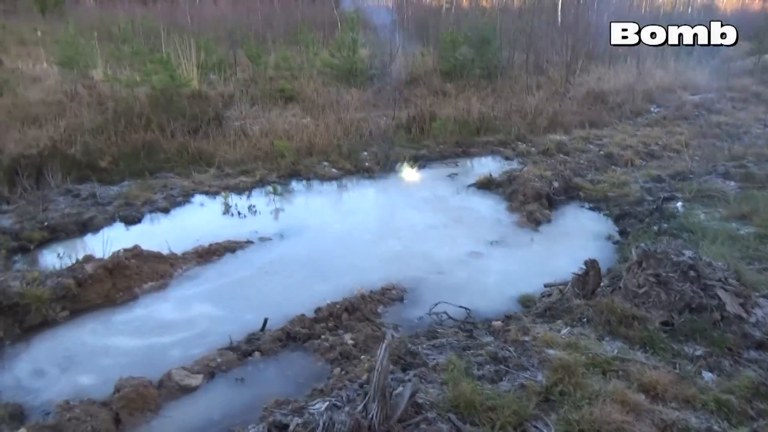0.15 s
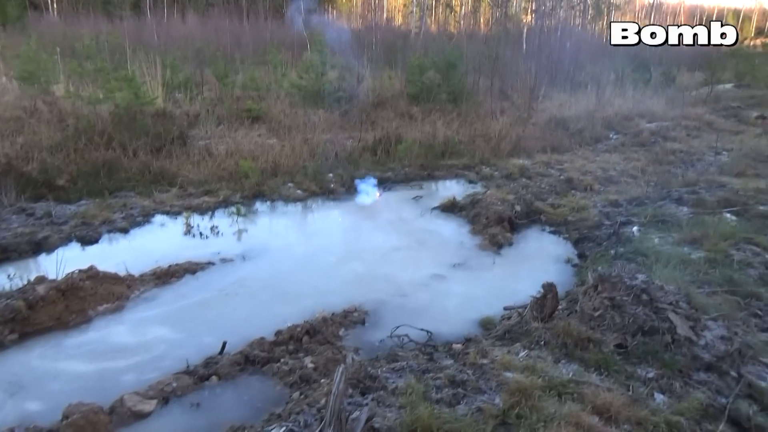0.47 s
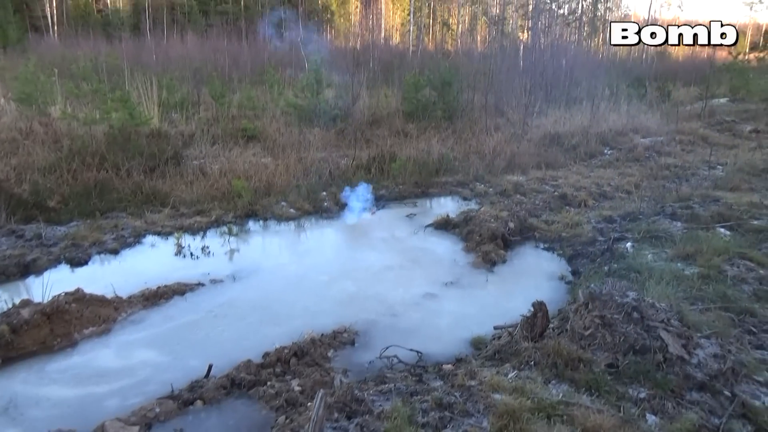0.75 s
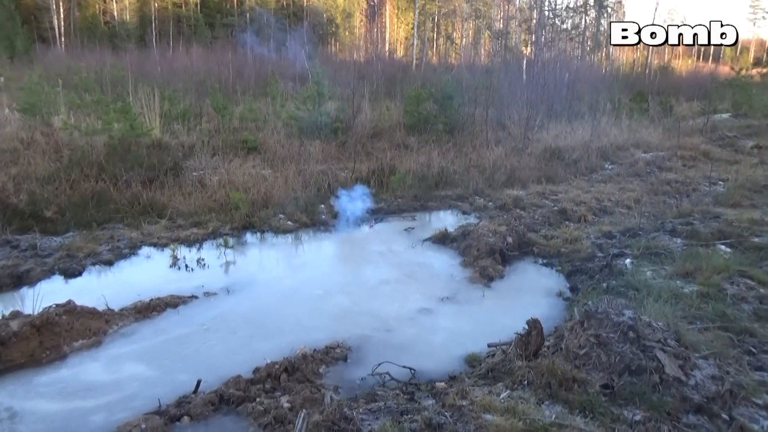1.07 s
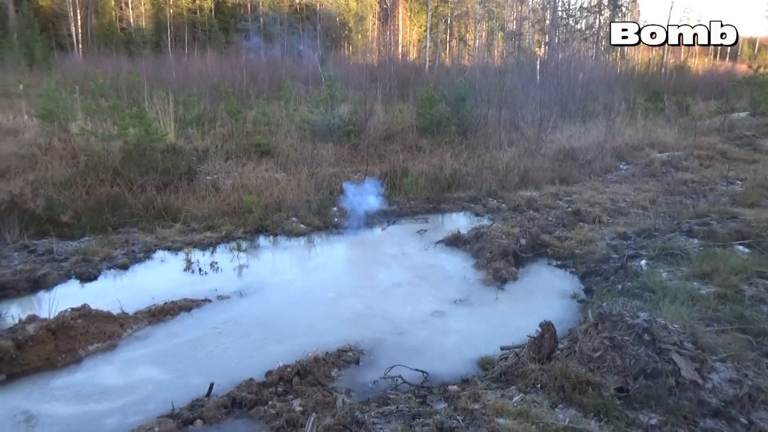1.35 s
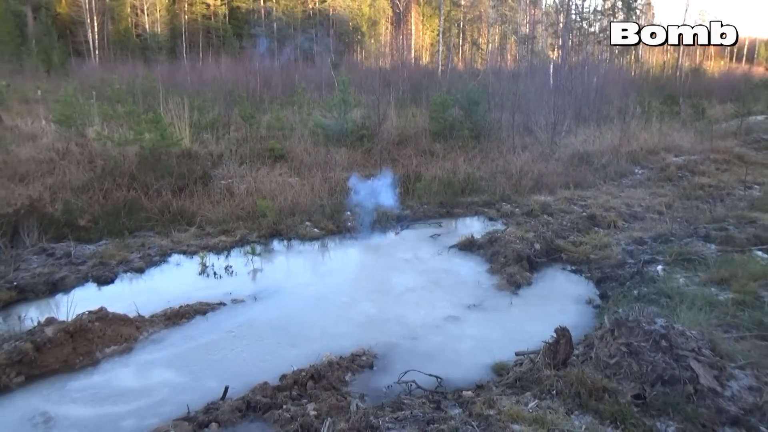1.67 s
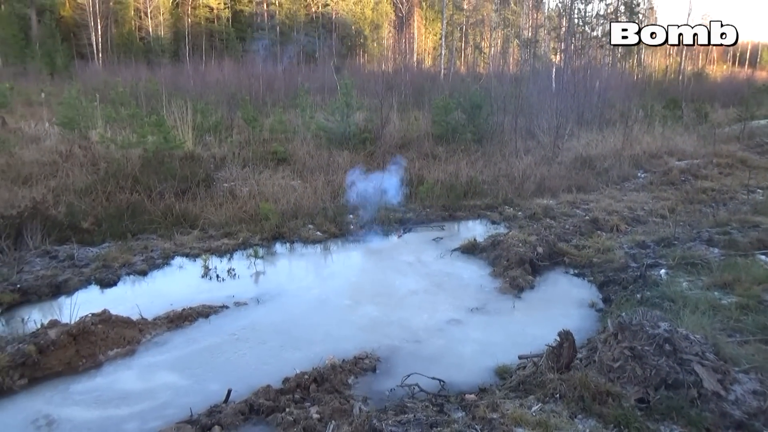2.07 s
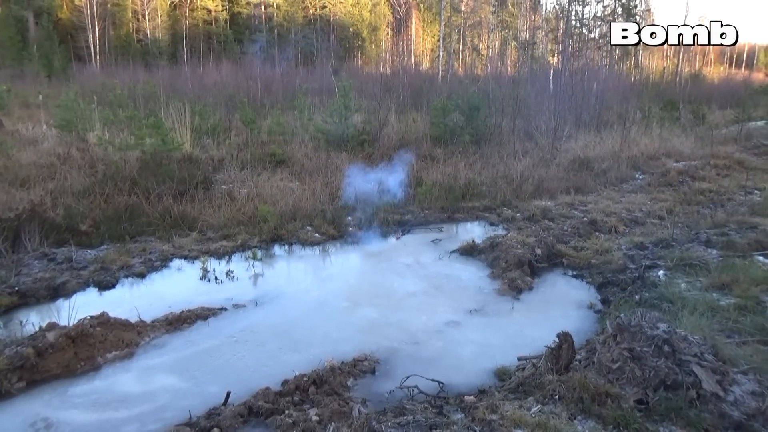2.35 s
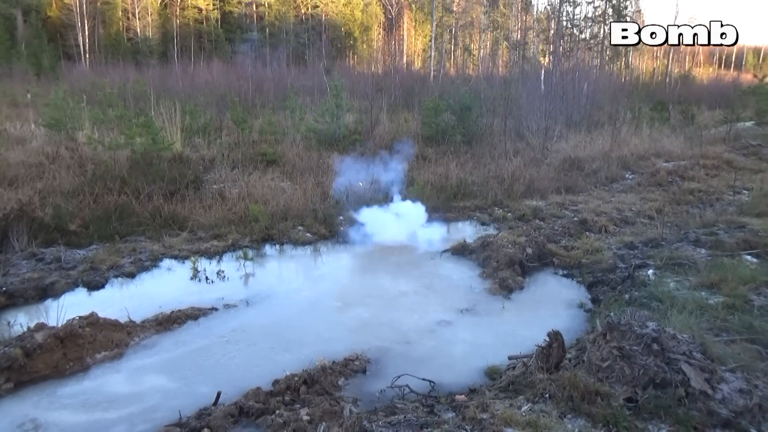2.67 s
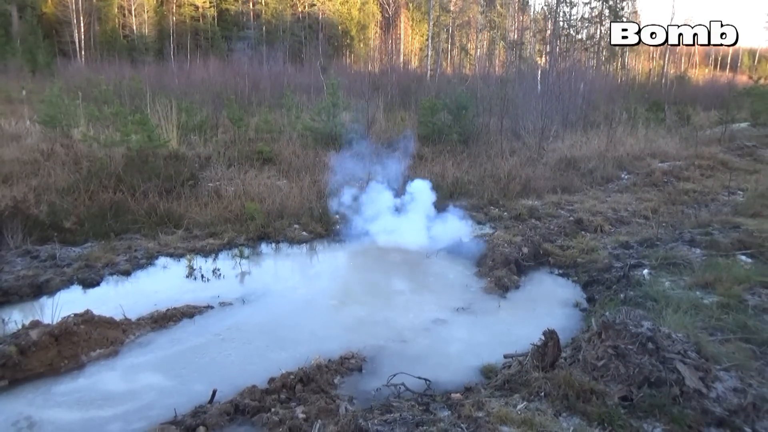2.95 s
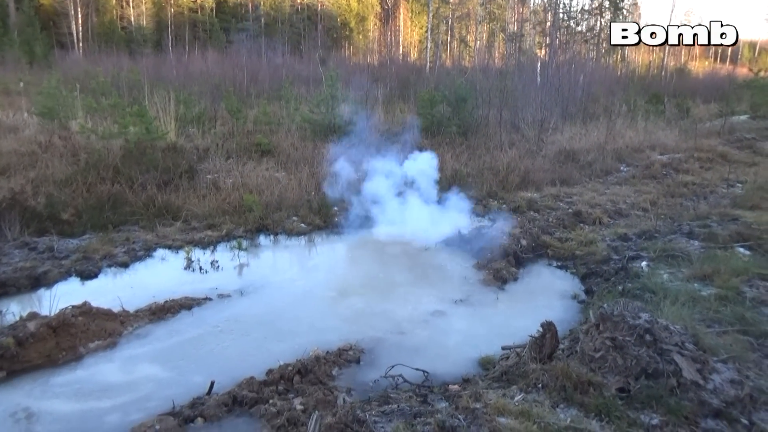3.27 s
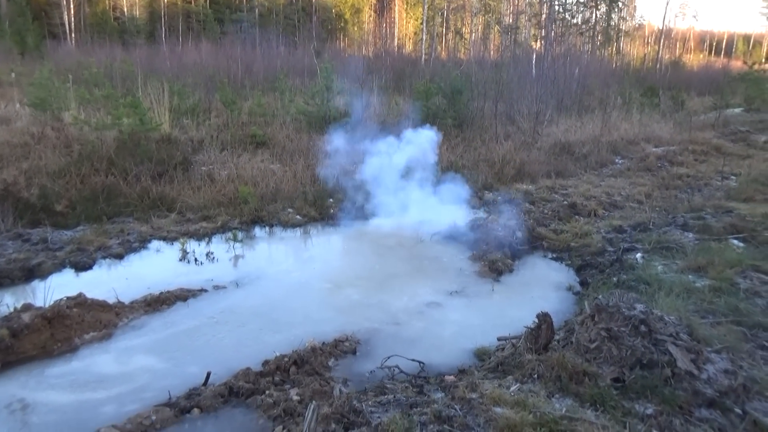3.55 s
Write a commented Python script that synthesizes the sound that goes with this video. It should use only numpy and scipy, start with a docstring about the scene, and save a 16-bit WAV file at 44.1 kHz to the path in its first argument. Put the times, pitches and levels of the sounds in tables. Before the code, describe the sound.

A firecracker fuse hisses, then one loud bang echoes away outdoors.

```python
"""A forest clearing, at the edge of a frozen puddle, where a firecracker lies. Its fuse spits, flares with
a whoosh, pops, then hisses for two seconds as a steady jet of gas. The bang overloads the microphone:
a ringing shock front, then a harsh crash over a boom that sinks in pitch. A long dull echo rolls back
from the trees while a few bits of debris snap on the ice, all over a low outdoor rumble."""
import sys
import numpy as np
from scipy import signal
from scipy.fft import rfft, irfft
from scipy.io import wavfile
from scipy.ndimage import uniform_filter1d

SR = 44100
rng = np.random.default_rng(int(sys.argv[2]) if len(sys.argv) > 2 else 0)


def inscribe(sig):
    """Save sig as 16-bit PCM at rate SR to the path in sys.argv[1].

    A 1-D sig is mono; a 2-D sig holds one channel per row.
    Samples are clipped to [-1, 1] before scaling.
    """
    pcm = np.round(np.clip(np.atleast_2d(sig).T, -1, 1) * 32767)
    wavfile.write(sys.argv[1], SR, pcm.astype(np.int16))


N = 163170
T = np.arange(N) / SR
BANG_S, CRASH_DELAY_S = 2.7385, .0115  # crash and boom come in just behind the shock

# Fader rides for the crash, the fuse's first burn, and the high hiss and lower rush of its jet.
# Each row: time in seconds, relative level in dB.
CRASH_RIDE = [(2.75, 1), (2.775, -5), (2.81, -6.5), (2.85, -1), (2.89, -3), (2.93, -4), (3.05, -6),
              (3.2, -13.5), (3.7, -18.5)]
PRIMER_RIDE = [(0, -9), (.02, -18.5), (.035, -14.5), (.065, -19), (.085, -21.5), (.11, -27), (.17, -25),
               (.25, -28), (.33, -26.5), (.39, -21.5), (.44, -25), (.49, -28.5), (.59, -32), (.66, -31),
               (.72, -31.5), (.8, -28.5)]
HISS_RIDE = [(0.83, -25.5), (0.882, -19.5), (1.118, -16.5), (1.224, -19.5), (1.508, -15.5), (1.53, -13),
             (1.83, -17), (1.85, -15), (2.014, -16), (2.034, -11), (2.076, -14.5), (2.592, -23),
             (2.604, -19), (2.72, -22)]
RUSH_RIDE = [(.72, -39), (.86, -40), (.95, -38), (1.25, -37), (1.58, -31), (1.8, -31), (2.04, -30.5),
             (2.3, -32), (2.5, -39.5), (2.72, -37)]
# Fader and pan rides. Each row: time in seconds, relative level in dB, left minus right in dB.
BOOM_RIDE = [(2.748, -25, -7), (2.758, -5, 7), (2.80, -1, 18), (2.85, -8.5, 5), (2.93, -7.5, 9.5),
             (2.97, -22, 20), (3.04, -21, 11), (3.09, -9.5, 6), (3.15, -16.5, 3), (3.3, -22.5, 6),
             (3.43, -21.5, 6), (3.5, -49, 2)]
ECHO_RIDE = [(2.74, -11, 19.5), (2.9, -12.5, 7), (2.98, -14, 5), (3.07, -5.5, 0), (3.13, -5.5, 0),
             (3.2, -8.5, 1), (3.28, -7.5, 4), (3.33, -8.5, 6), (3.39, -11, 7.5), (3.49, -10.5, 8),
             (3.57, -12.5, 7.5), (3.7, -14.5, 8.5)]
# Tone of each noise layer. Each row: frequency in Hz, relative level in dB.
CRASH_EQ = [(100, 8), (400, -9.5), (900, -22), (1500, 1), (3000, -3), (7000, -1), (10000, -3), (15500, -10)]
ECHO_EQ = [(30, -34), (70, -35), (110, -40), (180, -9.5), (330, -3.5), (600, 1.5), (900, -1), (1400, -1.5),
           (2000, -5.5), (3200, -14), (6400, -23), (9500, -34.5), (15500, -49)]
PRIMER_EQ = [(50, -15), (110, 4.5), (300, 5), (520, -1), (1000, -1.5), (1800, -7.5), (3000, -13.5),
             (4500, -9.5), (6000, -5), (7500, 2), (10500, 2), (13000, 0), (15500, -3.5)]
HISS_EQ = [(1500, -45), (4000, -18.5), (5300, -13.5), (6300, -5.5), (7800, -1.5), (9500, -0.5), (10900, -3),
           (12200, -9.5), (14000, -11.5), (15700, -17)]
RUSH_EQ = [(300, -40), (750, -29), (1150, -10.5), (1500, -0.5), (1950, -1), (2150, -3), (2650, -1.5),
           (3000, 2), (3400, -3.5), (4100, -4), (4600, 1), (7000, -6.5), (15000, -25)]
FLARE_EQ = [(30, -26), (70, -83), (110, -0.5), (250, 2), (450, -7.5), (800, -5.5), (1200, -11.5),
            (1800, -12.5), (2600, -21), (4000, -28), (12000, -35)]
AIR_EQ = [(20, -4), (55, -13), (75, -2.5), (98, 8.5), (135, -2), (200, -3), (330, -11.5), (520, -8.5),
          (780, -6), (950, -7), (1200, -15.5), (1700, -21.5), (2200, -23), (3000, -30), (4500, -41),
          (7000, -39), (15000, -39)]
# Panning by band. Each row: frequency in Hz, left minus right in dB.
CRASH_LEAN = [(110, 2), (200, 10), (700, 9.1), (1300, 2), (4400, 1.7), (15000, 1.1)]
ECHO_LEAN = [(110, -1), (200, 3.5), (380, 5.5), (700, -2), (2400, -1), (8000, -3.5)]
AIR_LEAN = [(60, -7), (110, 4), (200, 13.5), (380, 12.5), (700, 17.5), (1300, 11.5), (2400, -10),
            (15000, 0)]
# Stereo focus. Each row: frequency in Hz, left-right likeness from 0 (wide) to 1 (mono).
CRASH_FOCUS = [(300, 0.64), (1500, 1), (4000, 0.64), (12000, 0.2)]
FUSE_FOCUS = [(100, 0.96), (1000, 0.87), (2400, 1), (4400, 0.87), (9000, 0.81), (15000, 0.78)]
AIR_FOCUS = [(30, 0.3), (100, 0.94), (250, 0.25), (500, 0), (1000, 0.24), (3000, .6), (15000, .5)]
# Fuse pops and landing debris. Each row: start in seconds, level in dB, pitch at the peak in Hz.
FUSE_POPS = [(.0505, -10, 4500), (.069, -11, 1900), (.2115, -14, 6500), (.7927, 1.5, 2600),
             (2.458, -15, 2300)]
DEBRIS_HITS = [(3.235, -19, 9000), (3.243, -17, 7950), (3.265, -32, 9500), (3.615, -29, 10000),
               (3.68, -27, 10100)]


def shock(ring_hz=620, rise_s=.00085, fall_s=.007, right_lag_s=.0003):
    """The pressure front rings unevenly in the microphone for a few milliseconds, left side first."""
    age = np.maximum(T - BANG_S - np.array([[0], [right_lag_s]]), 0)
    turns = ring_hz * age + 0.26 * wander(rate_hz=420)
    envelope = np.minimum(age / rise_s, 1) * np.exp(-age / fall_s)
    return -amp(10) * envelope * np.sin(2 * np.pi * turns)


def crash(dull_db_per_s_khz=4.5):
    """Dense crackling scatter off the nearby ground and brush, dulling as it dies."""
    def dull(t, hz):
        return -np.maximum(t - BANG_S, 0) * dull_db_per_s_khz * hz / 1000
    scatter = noise(CRASH_EQ, CRASH_FOCUS, patchy_db=1.7, shape=dull, lean=CRASH_LEAN)
    return scatter * amp(curve(CRASH_RIDE) + 1.8 * wander(rate_hz=58)) * (T > BANG_S + CRASH_DELAY_S)


def boom(start_hz=290, end_hz=87.44, sink_s=.155, spread_hz=75, right_lead_turns=.17):
    """The body of the blast: a rough band of rumble that sinks in pitch."""
    age = np.maximum(T - BANG_S - CRASH_DELAY_S, 0)
    hz = end_hz + (start_hz - end_hz) * np.exp(-age / sink_s)
    turns = np.cumsum(hz) / SR + np.array([[0], [right_lead_turns]]) * hz / start_hz
    roughness = wander(spread_hz) + 1j * wander(spread_hz)
    churn = .3 + roughness * (hz / start_hz) ** .5  # a steady core under random level and phase
    compressed = churn / np.sqrt(abs(churn))
    tone = np.sqrt(2) * (compressed * np.exp(2j * np.pi * turns)).real * (age > 0)
    return tone * amp(1 + curve(BOOM_RIDE)) * pan(curve(BOOM_RIDE, column=2))


def echo(neutral_s=3.204, dull_db_per_s_octave=7.5):
    """Countless trunks throw the bang back, louder in the left channel; air dulls the later returns."""
    def absorb(t, hz):
        octaves = np.log2(np.maximum(hz, 500) / 800)
        return -dull_db_per_s_octave * np.maximum(t - neutral_s, -.2) * octaves
    returns = noise(ECHO_EQ, 0.95, patchy_db=1, shape=absorb, lean=ECHO_LEAN, size=1024)
    level_db = curve(ECHO_RIDE) + 1.35 * wander(rate_hz=160)
    return returns * amp(level_db) * pan(curve(ECHO_RIDE, column=2)) * (T > BANG_S)


def fuse(catch_s=0.741, scoop_db=16, scoop_hz=4500):
    """A sputtering first burn, joined by a steady jet of gas; the bang ends both."""
    def smoulder(t, hz):  # the weaker the first burn, the thinner its upper mids
        weakness = np.clip((-28 - curve(PRIMER_RIDE, t)) / 10, 0, 1)
        return -scoop_db * weakness * np.exp(-np.log2((hz + 1) / scoop_hz) ** 2)
    primer = noise(PRIMER_EQ, FUSE_FOCUS, patchy_db=3, shape=smoulder)
    primer *= amp(curve(PRIMER_RIDE) + 1.1 * wander(rate_hz=470))
    fade_in = [(catch_s - .1, -80), (catch_s, -38), (catch_s + 0.038, -24)]
    sputter = wander(rate_hz=86) + wander(rate_hz=220)
    hiss = noise(HISS_EQ, FUSE_FOCUS, patchy_db=1.78)
    hiss *= amp(1.5 + curve(fade_in + list(HISS_RIDE)) + 0.7 * sputter)
    rush = noise(RUSH_EQ, FUSE_FOCUS, patchy_db=1.4, size=1024)
    rush *= amp(3.5 + curve(RUSH_RIDE) + 0.65 * sputter)
    return (primer + hiss * pan(lean_db=0.5) + rush * pan(lean_db=-0.2)) * (T < BANG_S)


def flare(peak_s=0.421, rise_s=0.045, fall_s=0.027, sweep_s_per_octave=0.0076):
    """A fluttering puff of flame: the treble peaks first and the bass last."""
    def swell(t, hz):
        late = t - peak_s + sweep_s_per_octave * np.log2(np.clip(hz, 300, 3000) / 700)
        width = np.where(late < 0, rise_s, fall_s)
        return -17 * np.log10(1 + abs(late / width) ** 3)
    whoosh = noise(FLARE_EQ, 0.95, patchy_db=1.5, shape=swell)
    return whoosh * amp(-11 + 0.89 * wander(rate_hz=170)) * pan(lean_db=1.0)


def snaps(rows, width_s=.00045, drop_per_s=650, fizz=.08, bounce_s=.0016):
    """Tiny snaps of a few falling cycles, each with a bounce off the ice and a short scatter."""
    out = np.zeros((2, N))
    t = np.arange(2048) / SR
    late = t - 2 * width_s
    for start, db, hz in rows:
        turns = hz * (1 - np.exp(-drop_per_s * late)) / drop_per_s
        chirp = np.cos(2 * np.pi * turns) + fizz * rng.standard_normal(len(t))
        snap = chirp * np.exp(-abs(late) / width_s)
        bounce = amp(-8) * np.interp(t - bounce_s, t, snap, left=0)
        spray = wander(rate_hz=5700)[:2 * len(t)].reshape(2, -1)
        scatter = amp(-26) * np.exp(-t / 0.0072) * spray
        sound = low_cut(snap + bounce + scatter, hz=970)
        slot = out[:, round(start * SR):][:, :len(t)]
        slot += amp(db) * sound[:, :slot.shape[1]]
    return out


def background(level_db=-32.5, dip_db=2):
    """A bed of low outdoor rumble and distant rustle, leaning left and quieter after the bang."""
    air = noise(AIR_EQ, AIR_FOCUS, patchy_db=2.0, lean=AIR_LEAN, size=2048)
    return air * amp(level_db - dip_db * (T > BANG_S))


def amp(db):
    """Decibels to gain."""
    return 10 ** (np.asarray(db) / 20)


def unit(x):
    """Scales to rms 1."""
    return x / np.sqrt(np.mean(x ** 2) + 1e-20)


def curve(rows, t=T, column=1):
    """One column of a ride, joined by straight lines in time."""
    table = np.transpose(rows)
    return np.interp(t, table[0], table[column])


def colour(rows, hz):
    """A table read on a log-frequency axis."""
    f, value = np.transpose(rows)
    return np.interp(np.log(hz + 1), np.log(f + 1), value)


def pan(lean_db):
    """Channel gains for a left-minus-right level."""
    return amp(np.array([[.5], [-.5]]) * lean_db)


def low_cut(x, hz):
    """Rolls off everything below hz."""
    return signal.sosfilt(signal.butter(4, hz, "highpass", fs=SR, output="sos"), x)


def wander(rate_hz):
    """Random motion of rms 1, rolled off above rate_hz."""
    hz = np.fft.rfftfreq(N, 1 / SR)
    return unit(irfft(rfft(rng.standard_normal(N)) / (1 + (hz / rate_hz) ** 4), N))


def noise(eq, focus, patchy_db, shape=lambda t, hz: 0 * t, lean=None, size=512):
    """Patchy stereo noise set to rms 1, then put through a moving EQ: shape(seconds, Hz) in dB."""
    def to_sound(spectra):
        return signal.istft(spectra.swapaxes(1, 2), nperseg=size, noverlap=size - hop)[1][:, :N]
    hop = size // 4
    t = np.arange(N // hop + 5)[:, None] * hop / SR
    hz = np.fft.rfftfreq(size, 1 / SR)
    a, b, c, d, patches = np.moveaxis(rng.standard_normal((len(t), len(hz), 5)), -1, 0)
    patches = unit(uniform_filter1d(uniform_filter1d(patches, size=6, axis=0), size=3, axis=1))
    likeness = colour(focus, hz) if np.ndim(focus) else focus
    left = a + 1j * b
    right = likeness * left + np.sqrt(1 - likeness ** 2) * (c + 1j * d)
    spectra = np.array([left, right]) * amp(colour(eq, hz) + patchy_db * patches)
    if lean:
        spectra *= pan(colour(lean, hz))[:, None]
    return to_sound(spectra * amp(shape(t, hz))) / to_sound(spectra).std()


def scene():
    """The mix: fuse, bang, echo and debris over the outdoor bed."""
    blast = shock() + low_cut(crash() + boom() + echo(), hz=84)
    return background() + fuse() + flare() + snaps(FUSE_POPS) + blast + snaps(DEBRIS_HITS)


def record(dry):
    """The microphone overloads at full scale, and the very top of the treble is cut."""
    clipped = dry / (1 + dry ** 8) ** (1 / 8)
    high_cut = signal.firwin(511, 15800, window=("kaiser", 8), fs=SR)
    return signal.oaconvolve(clipped, high_cut[None], "same")


dry = scene()
out = record(dry)
inscribe(out)
```